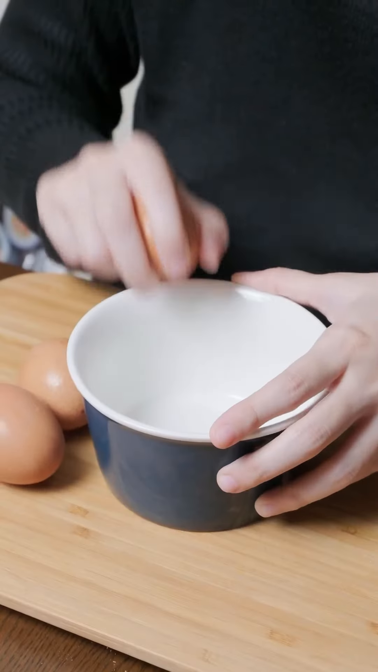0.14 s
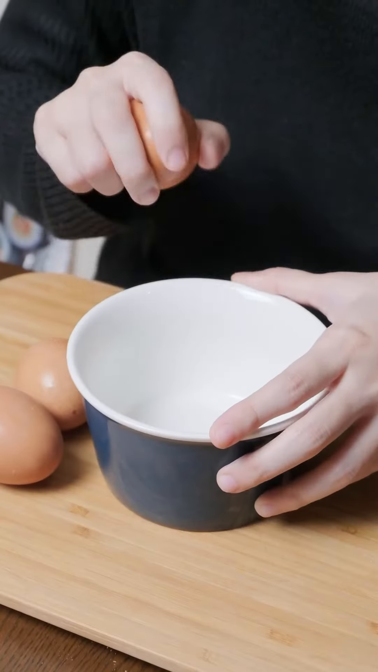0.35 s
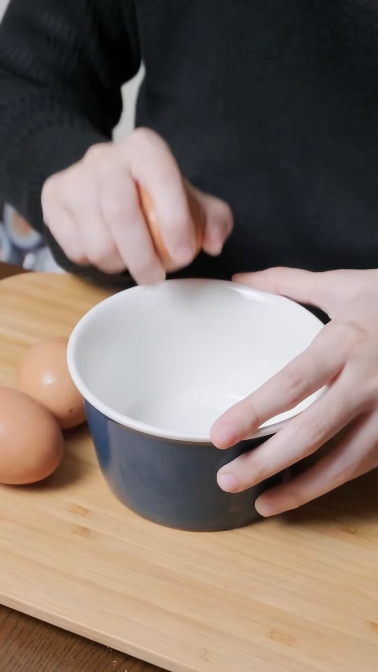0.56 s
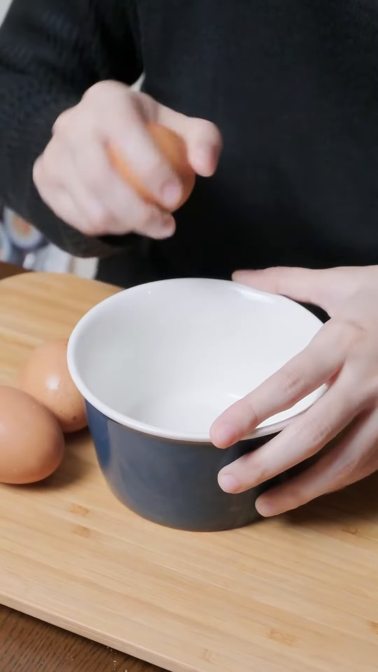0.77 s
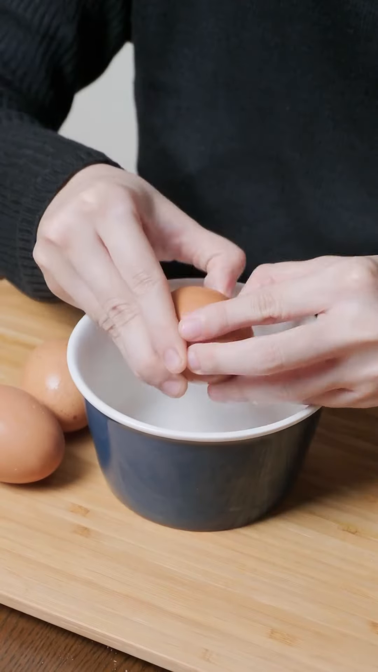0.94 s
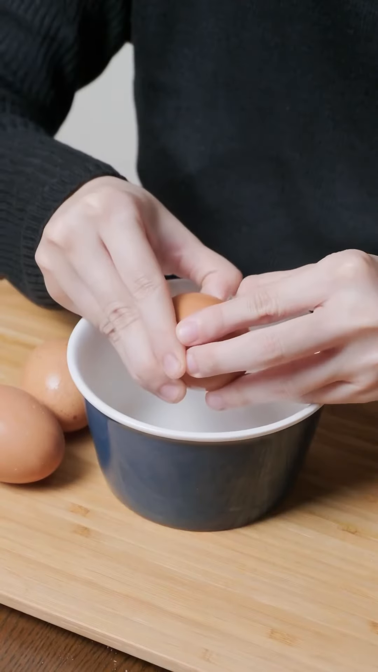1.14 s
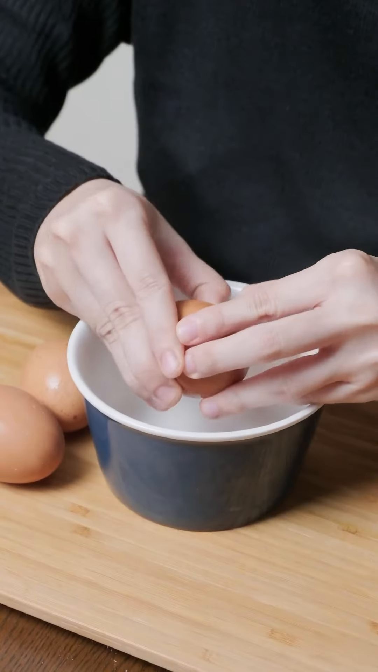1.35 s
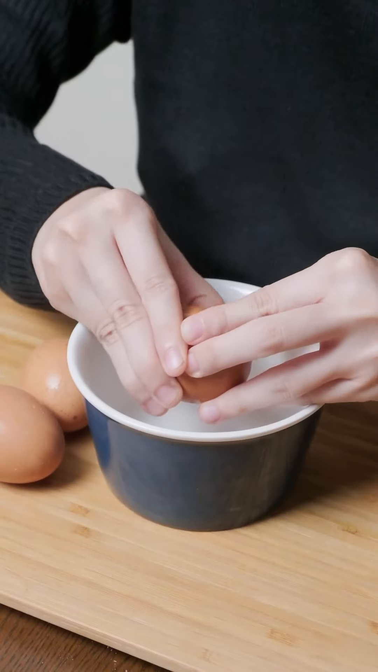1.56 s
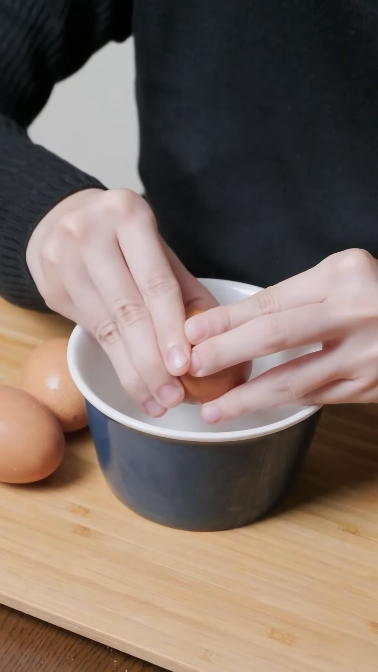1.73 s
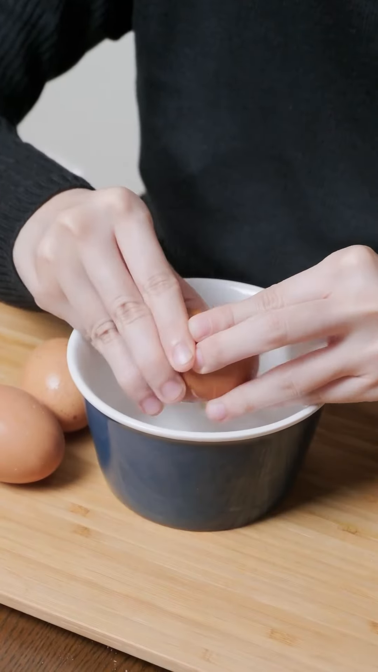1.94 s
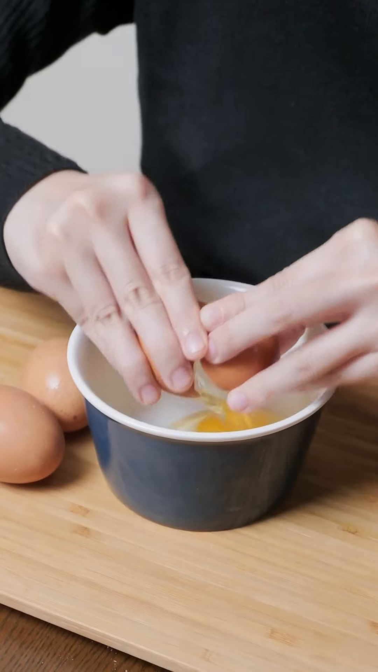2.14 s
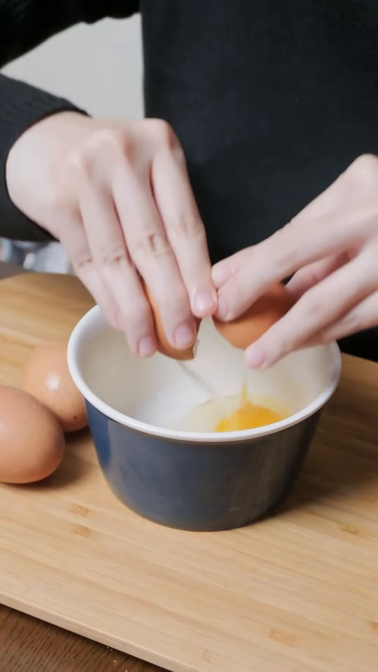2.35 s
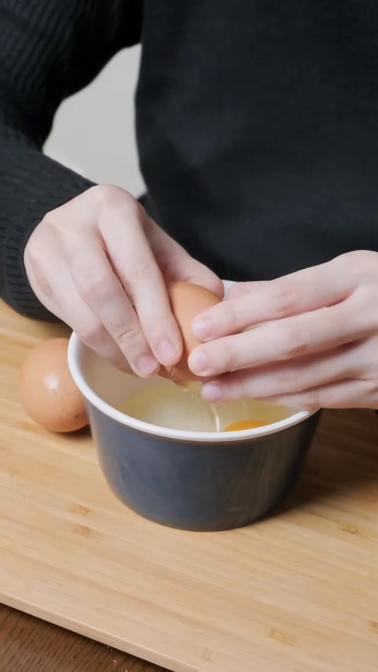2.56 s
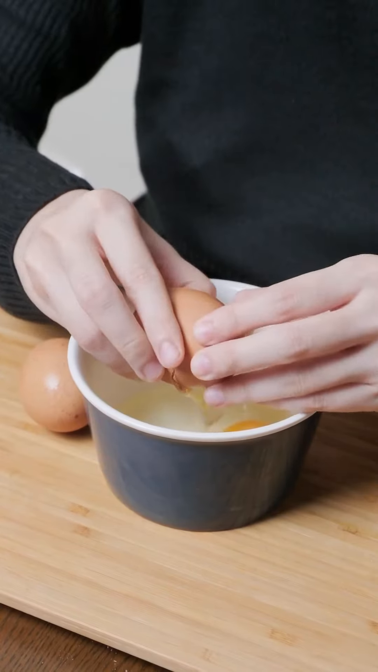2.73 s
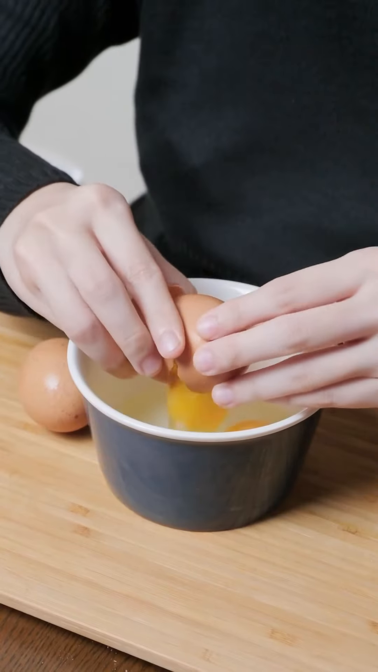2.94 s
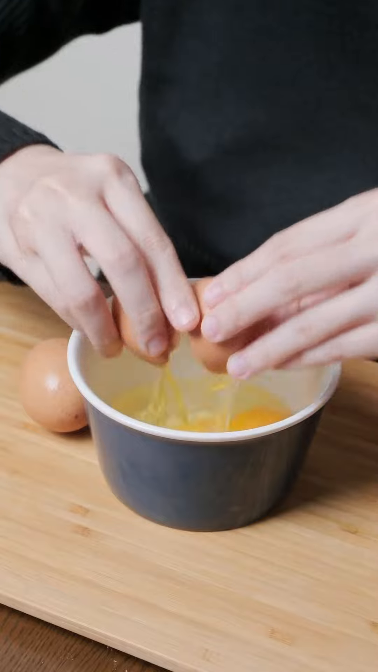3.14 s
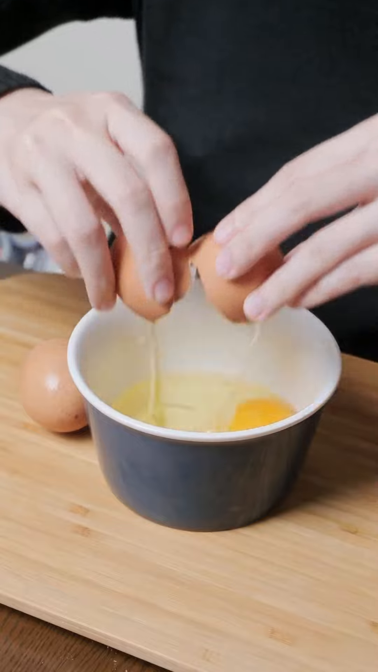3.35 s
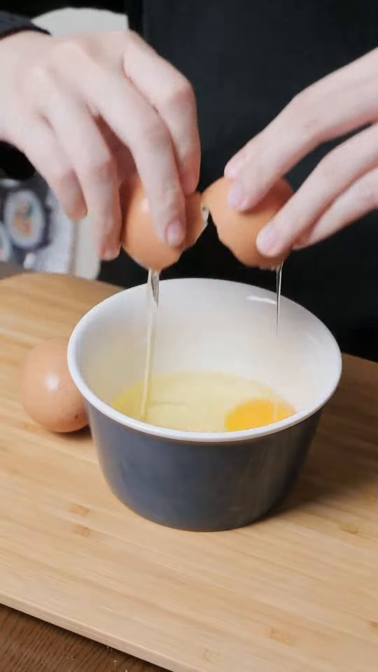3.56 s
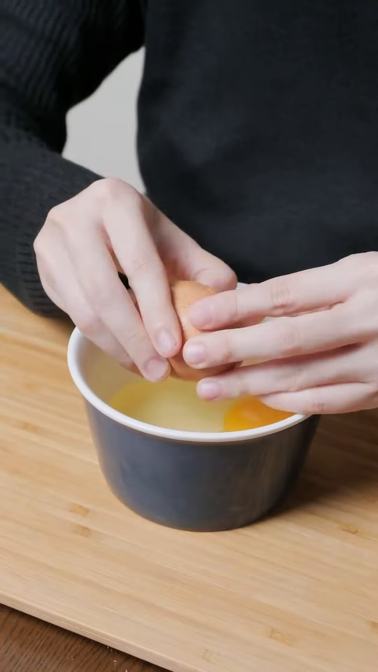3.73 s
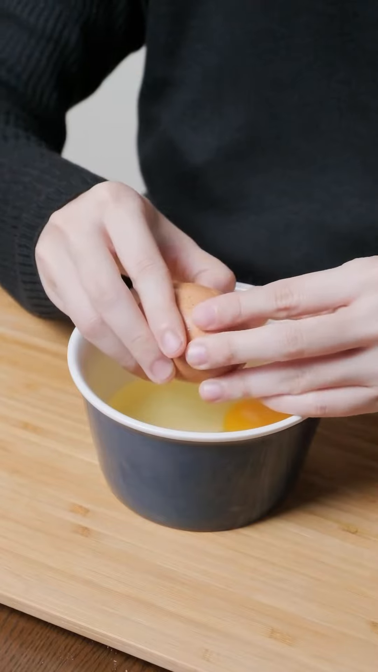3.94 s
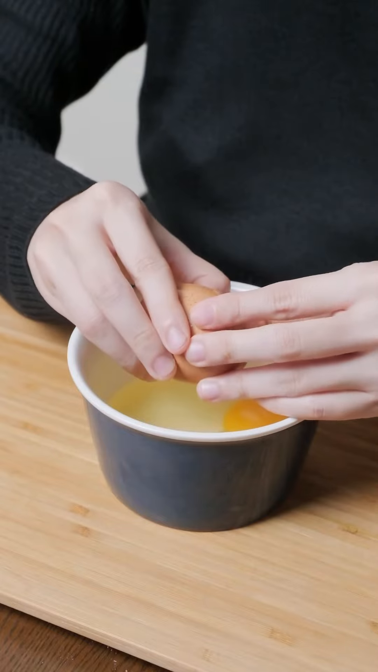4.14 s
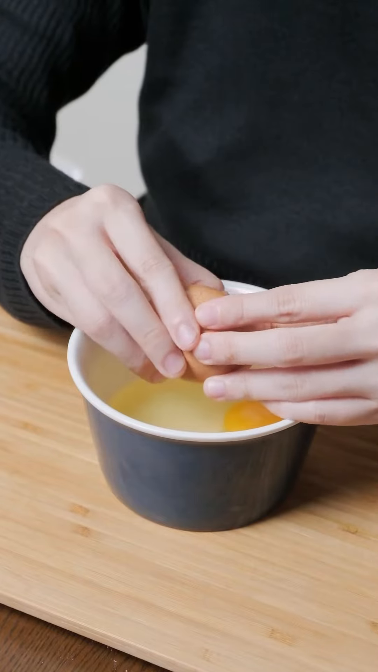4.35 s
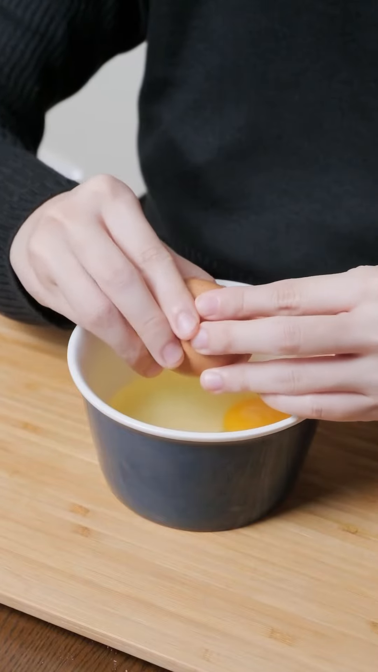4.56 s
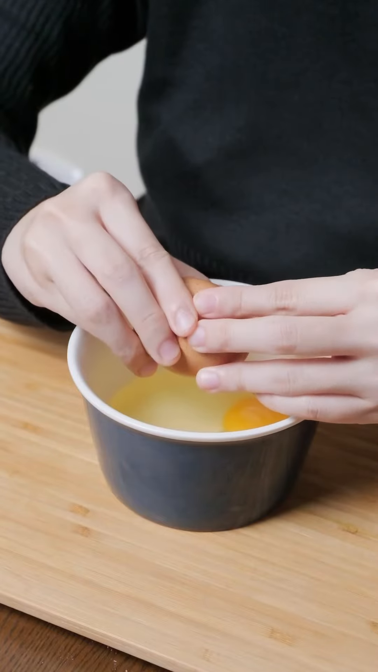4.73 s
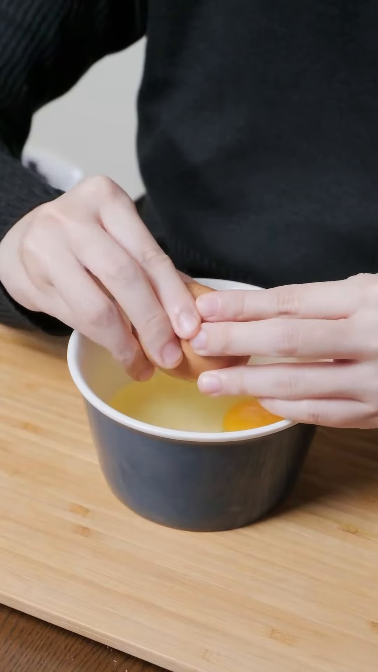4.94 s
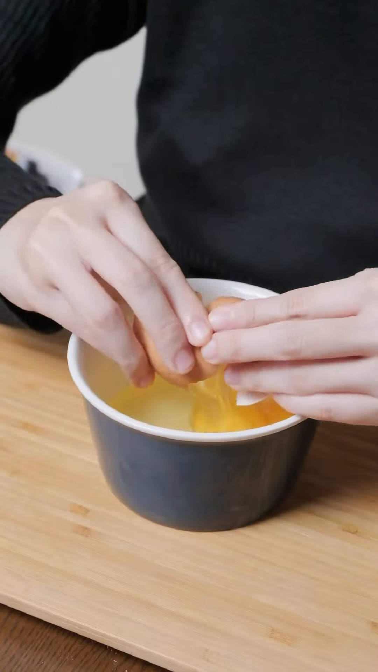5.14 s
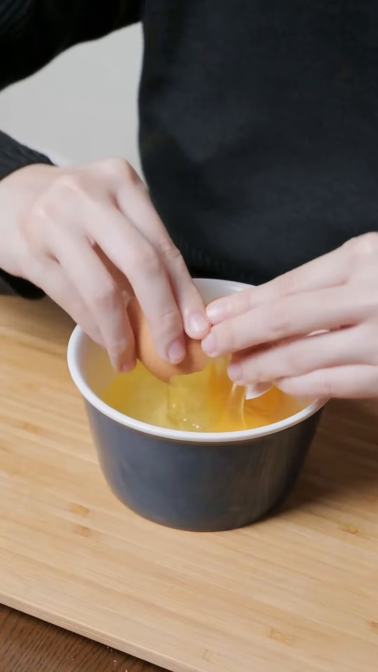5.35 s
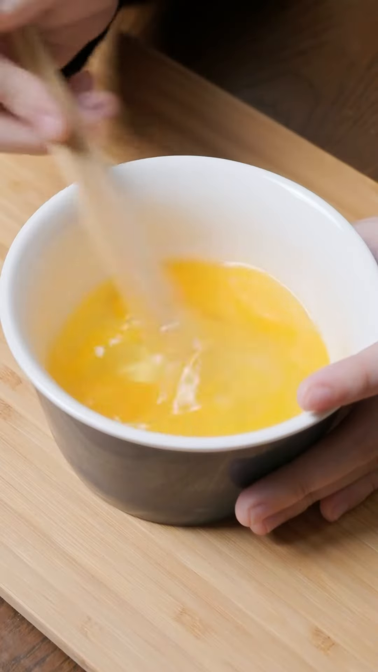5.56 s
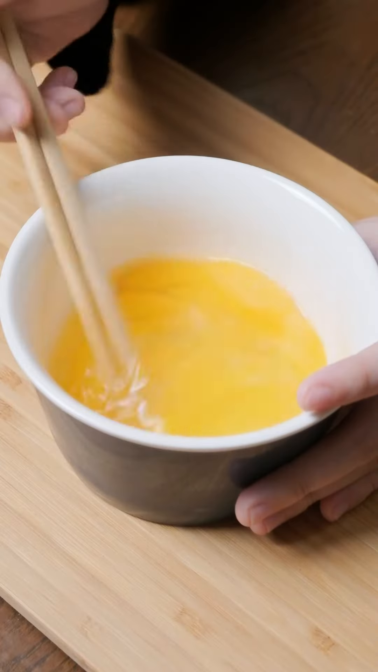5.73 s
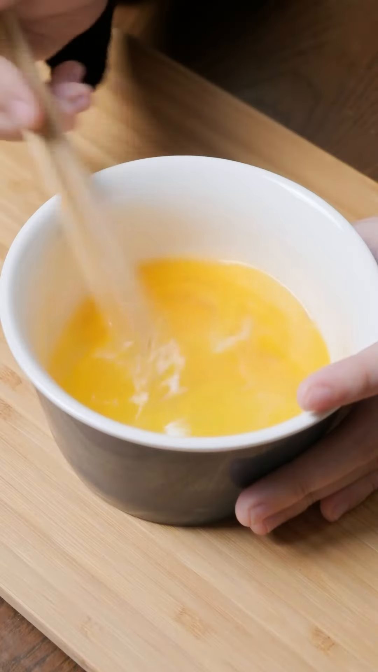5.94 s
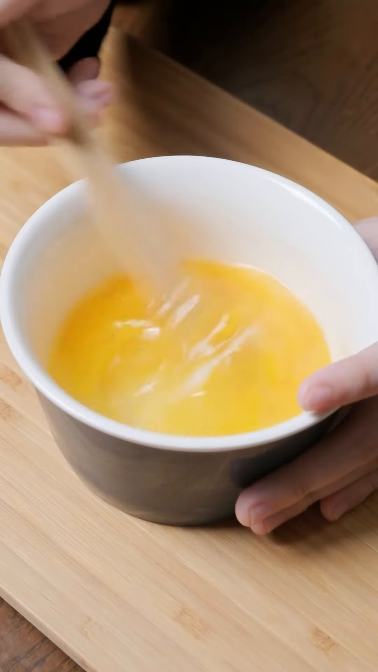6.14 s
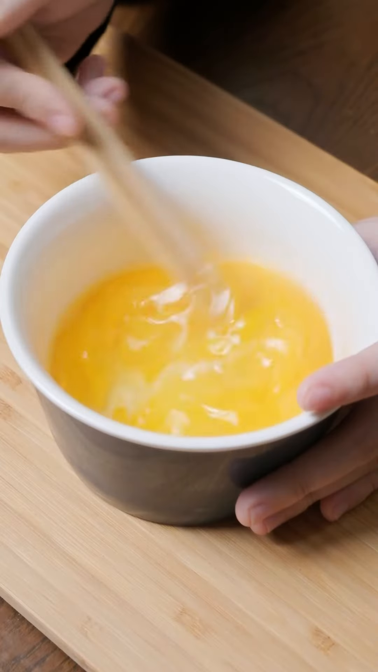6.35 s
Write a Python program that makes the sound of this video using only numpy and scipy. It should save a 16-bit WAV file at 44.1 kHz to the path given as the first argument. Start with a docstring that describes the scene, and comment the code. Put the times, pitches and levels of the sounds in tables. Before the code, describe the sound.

Two blunt, loud knocks of egg on a bowl open the scene, slapping the wooden board and echoing round the kitchen. Much quieter crisp shell snaps, thumb-squeezed ticks and small bubbling plops follow in bursts with pauses between. At the end, a short wet swish leads into rapid chopstick taps on ceramic. Close microphone, constant soft room rumble and hiss, slightly ducked after the knocks.

```python
"""Over steady room noise and hiss, an egg is knocked hard twice on the rim of a ceramic bowl, with fainter knocks.
The blows ring struck modes, thump and crunch; the kitchen echoes in filtered noise, and the gain ducks.
Shells are then pulled apart: clustered clicks make dry snaps, films burst and bubbles ring in wet smacks.
At the end wooden chopsticks drag through the eggs and click on the bowl about five times a second."""
import sys
import numpy as np
from scipy import signal
from scipy.fft import rfft, irfft
from scipy.io import wavfile

SR = 44100
rng = np.random.default_rng(int(sys.argv[2]) if len(sys.argv) > 2 else 0)


def put_to_file(sound):
    """Save the sound as 16-bit audio at rate SR, in the file named by the first command-line argument."""
    columns = np.atleast_2d(sound).T  # one column per channel
    safe = np.clip(columns, -1, 1)
    whole_steps = np.round(safe * 32767)
    wavfile.write(sys.argv[1], SR, whole_steps.astype(np.int16))


N = 286209
T = np.arange(6000) / SR  # time within one short sound [s]


def amp(db):
    """Decibels to amplitude ratio."""
    return 10 ** (np.asarray(db) / 20)


def at_level(x, db):
    """Scales a short sound to the energy of 10 ms at this level."""
    energy = np.sum(x ** 2) + 1e-20
    return amp(db) * x * np.sqrt(0.01 * SR / energy)


def read(points, hz, axis=1):
    """A table's column interpolated along log frequency."""
    points = np.array(points)
    return np.interp(np.log(hz + 1), np.log(points[:, 0]), points[:, axis])


def add(mix, s, sound):
    """Lays a sound into the mix from s seconds, cutting it at the mix's end."""
    part = mix[round(s * SR):][:len(sound)]
    part += sound[:len(part)]


def drive(force, response):
    """Lets a force excite a body, by convolution with its response."""
    return signal.fftconvolve(force, response)[:len(T)]


def click(spectrum):
    """The causal, minimum-phase impulse of a given colour."""
    log_gain = np.log(amp(read(spectrum, abs(np.fft.fftfreq(len(T), 1 / SR)))))
    minimum_phase = np.exp(np.conj(signal.hilbert(log_gain)))
    return np.fft.ifft(minimum_phase).real * (T < T[-1] / 2)


def mode(hz, t60, glide=0):
    """A dying sine whose pitch may drift by a share over its life; it radiates little far below its pitch."""
    pitch = hz * (1 + glide * np.minimum(T / t60, 1))
    decay = np.exp(-np.log(1000) * T / t60)
    swing = np.sin(2 * np.pi * np.cumsum(pitch) / SR) * decay
    return signal.lfilter(*signal.butter(1, hz / 4, "high", fs=SR), swing)


def ring(modes, stretch=1):
    """Modes of an object; neighbours swing in opposite senses."""
    out = np.zeros(len(T))
    for k, (hz, db, t60) in enumerate(modes):
        out += (-1) ** k * amp(db) * mode(hz * stretch, t60)
    return out


def crumble(length, per_s=7000, spread_db=1.5, first=0.44):
    """The force of one break, followed by a dying cluster of tiny ones."""
    size = amp(spread_db * np.minimum(rng.exponential(1, len(T)), 4))
    sense = rng.choice([-1, 1], len(T))
    happens = rng.random(len(T)) < per_s / SR
    force = size * sense * happens * np.exp(-(T / (1.8 * length)) ** 2)
    force /= np.linalg.norm(force) + 1e-9
    force[0] += first
    return force


def noise(gain):
    """Noise of unit level, shaped by a gain at each frequency."""
    x = irfft(rfft(rng.standard_normal(N)) * gain, N)
    return x / x.std()


# colour of the kitchen's steady noise: (frequency [Hz], relative density [dB per Hz])
AIR_COLOUR = [(12, -30), (20, -1.5), (79, -1), (158, -10.5), (187, -1.5), (277, -11), (377, -9.5),
              (607, -10), (1250, -13), (1600, -20), (2000, -22.5), (4500, -28), (6200, -29.5), (9000, -51)]
# level of that noise over time: (time [s], level [dB])
AIR_LEVEL = [(0, -54.5), (1.002, -56), (2.299, -57), (3.4, -58.5), (4.501, -58.5), (6.5, -59)]
# soft resonances in the room noise: (frequency [Hz], width [Hz], level [dB])
AIR_RESONANCES = [(186, 90, -77), (366, 60, -76), (608, 63, -65), (1076, 240, -69.5), (5800, 420, -75)]
# colour of each channel's own hiss: (frequency [Hz], relative density [dB per Hz])
HISS_COLOUR = [(30, 8.5), (400, 4.5), (3000, -1.5), (10000, 2), (16000, 0)]


def air(hiss_db=-64.5):
    """Steady room noise with a few soft resonances, under a faint independent hiss in each channel."""
    hz = np.fft.rfftfreq(N, 1 / SR)
    hum = np.zeros(N)
    for centre, width, db in AIR_RESONANCES:
        hum += amp(db) * noise(1 / (1 + (2 * (hz - centre) / width) ** 2))
    level_db = np.interp(np.arange(N) / SR, *np.transpose(AIR_LEVEL))
    room = noise(amp(read(AIR_COLOUR, hz))) * amp(level_db)
    hiss = np.array([noise(amp(read(HISS_COLOUR, hz))) for _ in range(2)])
    return hum + room + amp(hiss_db) * hiss


# the bowl, damped by hand and board: (frequency [Hz], relative level [dB], t60 [s])
BOWL_MODES = [(134, -16.5, 0.14), (192, -11, 0.11), (408, -14.5, 0.022), (690, -8.5, 0.0076),
              (970, -1, 0.013), (1110, -9, 0.034), (1210, -6, 0.017), (1582, -6.5, 0.036), (1890, -9, 0.01),
              (2370, -1.5, .011), (2760, -25, 0.14), (3640, -14, .018), (4320, -17, 0.0095),
              (4730, -21, 0.057), (5568, -24, .08), (5800, -25.5, 0.12), (6900, -27, 0.04),
              (10600, -19, .025)]
# egg against the rim: (time [s], ring level [dB], contact brightness [Hz],
#   thump pitch of the bowl on its board [Hz], thump level [dB], crunch level of the shell [dB])
RIM_KNOCKS = [(0.1899, -12.5, 1300, 414, -16, -36.5), (0.1927, -10.5, 796, 745, -4.5, -31.5),
              (0.4703, -39, 2506, 428, -49.5, -54), (0.493, -14.5, 2010, 499, -17, -7),
              (0.496, -20, 2015, 942, -20, -20), (0.7774, -43.5, 2000, 438, -47.5, -58.5)]


def knocks():
    """The blunt egg rings the bowl through a softened contact, and the bowl thumps on the board."""
    out = np.zeros(N)
    bowl = ring(BOWL_MODES)
    for s, ring_db, bright_hz, thump_hz, thump_db, _ in RIM_KNOCKS:
        contact = np.exp(-2 * np.pi * bright_hz * T)
        thump = mode(thump_hz, 0.021) * (1 - np.exp(-T / 0.0015))
        add(out, s, at_level(drive(contact, bowl), ring_db) + at_level(thump, thump_db))
    return out


# the shell crushed on the rim: (frequency [Hz], relative level [dB])
CRUNCH_COLOUR = [(500, -22.5), (1500, -12.5), (2270, -0.5), (2950, -13.5), (3750, 0.5), (4400, -3.5),
                 (5000, -6), (5600, 1.5), (6300, -12), (10700, -19), (15000, -15)]


def crunches():
    """The shell gives way on the rim, then caves in for a few milliseconds."""
    out = np.zeros(N)
    for s, *_, crunch_db in RIM_KNOCKS:
        give = crumble(0.001, per_s=34000)
        cave_in = crumble(0.0033, per_s=16000, spread_db=0, first=0)
        add(out, s, at_level(drive(give + 1.2 * cave_in, click(CRUNCH_COLOUR)), crunch_db))
    return out


# the board's crowded modes: (frequency [Hz], relative level [dB])
SLAP_COLOUR = [(90, -15.5), (150, -2), (280, -2.5), (700, -2.5), (1100, 1.5), (1600, -2), (1900, -15.5),
               (2700, -22), (3300, -30.5), (8000, -47.5)]


def board(db=-9):
    """Each knock also slaps the wide board 1 ms later, which radiates into the whole room."""
    out = np.zeros(N)
    for s, ring_db, *_ in RIM_KNOCKS:
        slap = drive(crumble(0.0023, first=1.2), click(SLAP_COLOUR))
        add(out, s + 0.001, at_level(slap, ring_db + db))
    return out


# the kitchen's echo, before each source's share:
#   (frequency [Hz], early level [dB], early t60 [s], late level [dB], late t60 [s])
ECHO = [(150, -12.5, 0.33, -17, .6), (490, -7, 0.36, -21.5, 0.34), (730, -17.5, 0.15, -18.5, .65),
        (1115, -7.5, 0.26, -17.5, .7), (1560, -9.5, .18, -19.5, .65), (2200, -14.5, 0.27, -26.5, 0.63),
        (3988, -12, 0.23, -22.5, 0.28), (5950, -13, 0.15, -23, .4), (9000, -10.5, 0.22, -23, 0.33),
        (14680, -18.5, 0.12, -29, .25)]


def kitchen(x, gap=0.005):
    """Dense reflections after a gap [s]: a quick early field and a fainter slow one, as decaying noise."""
    hz, t, z = signal.stft(rng.standard_normal(SR), SR, nperseg=256)
    early_db, early_t60, late_db, late_t60 = (read(ECHO, hz, axis=k)[:, None] for k in range(1, 5))

    def power(db, t60):
        """Exponential decay whose total energy is set by the level."""
        rate = 2 * np.log(1000) / t60
        return amp(db) ** 2 * rate / SR * np.exp(-rate * t)

    envelope = np.sqrt(power(early_db, early_t60) + power(late_db, late_t60))
    tail = signal.istft(z * envelope, SR, nperseg=256)[1]
    return signal.fftconvolve(x, np.r_[np.zeros(round(gap * SR)), tail])[:N]


# colours of the dry snap, the splinters' fizz and the wet hollow: (frequency [Hz], relative level [dB])
SNAP_COLOUR = [(200, -50), (1200, -44), (2400, -15.5), (3500, 6), (4400, 5), (5500, 11), (6400, 5.5),
               (7300, -5.5), (10000, -37)]
FIZZ_COLOUR = [(500, -52), (4000, -29), (6500, -18), (7700, -2), (9500, -2), (11000, -4), (14000, 1),
               (16000, -9.5)]
HOLLOW_COLOUR = [(150, -85), (600, -52), (1300, -7.5), (1800, 2.5), (2500, 2.5), (3200, -26.5),
                 (5000, -36.5)]
# an egg held in the hands: (frequency [Hz], relative level [dB], t60 [s])
HAND_MODES = [(297, -11.5, 0.018), (568, -2.5, 0.012), (997, 0.5, 0.021)]
# a closed egg thuds in the hands, a gaping one rings.
# levels against the snap, before brittleness: (closed [dB], gaping [dB])
HOLLOW_LEVELS = (-9, 9)
THUD_LEVELS = (0.5, -31.5)
# harder breaks shed more splinters: fizz against a hard snap [dB], and its gain per dB of snap
HARD_SNAP_DB, FIZZ_DB, FIZZ_GROWTH = -30, -6, 0.2
BRITTLE_LOSS = 1.06  # dB that hollow and thud lose for each dB of fizz gained by brittleness
# shell breaking: (time [s], crumbling time scale [s], snap level [dB], hollow pitch [Hz],
#   how far the shell gapes [0-1], brittleness [dB])
SHELL_CRACKS = [(.972, 0.0021, -52, 2630, 0.06, 4), (.9896, 0.0022, -32, 2600, .1, 1),
                (1.0593, 0.0034, -28, 2300, 0.07, 1), (1.3678, 0.0019, -48.5, 2140, 0.4, 0.5),
                (1.4994, .0015, -60.5, 2270, 0.43, -2.5), (1.7038, 0.0019, -46.5, 2170, 0.15, 3),
                (1.7334, .002, -47.5, 2540, 0.13, 0.5), (1.8822, 0.0022, -47.5, 2200, 0.18, -3),
                (1.926, 0.0042, -48, 2280, 0.16, 1), (1.9428, .0016, -33, 3060, 0.27, 4.5),
                (1.9751, 0.0042, -30, 2717, 0.71, -1.5), (2.0642, 0.0014, -40, 1840, 0.62, 1),
                (2.1206, 0.0012, -51.5, 1970, .5, 6.5), (2.426, 0.0064, -44.5, 1920, 0.1, 1),
                (2.5057, 0.012, -37.5, 2300, 0.2, -2), (2.5129, 0.0056, -31, 2280, 0.03, 0),
                (2.5214, .0017, -29, 2370, 0.3, -3), (2.798, .0035, -46.5, 2530, 0.2, -0.5),
                (2.8045, .0024, -30, 1530, 0.39, 2), (2.816, 0.0057, -34.5, 1680, 1, 3.5),
                (2.832, 0.0026, -29.5, 1786, 0.43, -4.5), (3.0402, 0.0017, -46, 2300, 0.22, -3),
                (3.0898, 0.0039, -45.5, 1970, .25, -3), (3.6468, 0.0017, -55.5, 2590, 0.13, 0),
                (3.689, 0.0011, -54, 2380, 0.28, 1), (3.8247, 0.0015, -53.5, 2538, 0.15, 2),
                (3.8847, .0019, -54.5, 2600, 0.28, 5.5), (4.188, 0.0017, -52, 1630, 0.04, -2.5),
                (4.2073, .002, -51, 2270, 0.02, -4), (4.2523, 0.0019, -34.5, 2120, 0.17, -3),
                (4.2636, 0.0024, -32, 2480, 0.07, 2), (4.7177, 0.0016, -55.5, 2620, 0.19, -1.5),
                (4.9687, 0.0047, -41, 3060, 0, 6), (4.983, 0.0094, -33.5, 2264, 0.09, -0.5),
                (4.9969, 0.0066, -25, 2670, 0.36, 0.5), (5.005, 0.0023, -24.5, 2395, 0.48, 1),
                (5.015, 0.0057, -33, 2870, 0.53, -0.5), (5.0833, 0.0022, -44.5, 2320, 0.46, -1)]


def shells():
    """Each fracture snaps, sheds splinters, rings the wet hollow of the shell and jolts the hands."""
    out = np.zeros(N)
    snap_click, fizz_click, hollow_click = click(SNAP_COLOUR), click(FIZZ_COLOUR), click(HOLLOW_COLOUR)
    hands = ring(HAND_MODES)
    for s, length, snap_db, hollow_hz, gape, brittle_db in SHELL_CRACKS:
        fizz_db = snap_db + FIZZ_DB + FIZZ_GROWTH * (snap_db - HARD_SNAP_DB) + brittle_db
        body_db = snap_db - BRITTLE_LOSS * brittle_db
        hollow_db = body_db + np.interp(gape, [0, 1], HOLLOW_LEVELS)
        thud_db = body_db + np.interp(gape, [0, 1], THUD_LEVELS)
        force = crumble(length, spread_db=6.5, first=0.6)
        snap = at_level(drive(force, snap_click), snap_db)
        fizz = at_level(drive(force, fizz_click), fizz_db)
        pitched = at_level(drive(force, mode(hollow_hz, 0.024)), -2.5)
        hollow = pitched + at_level(drive(force, hollow_click), -6)
        thud = at_level(drive(force, hands), thud_db)
        add(out, s, snap + fizz + at_level(hollow, hollow_db) + thud)
    return out


# thumbs working at the shell: (start [s], end [s], tick rate [per s], level of the softest ticks [dB])
THUMB_SQUEEZES = [(1.15, 1.87, 20.6, -65), (1.891, 2.12, 34.8, -58), (2.398, 2.5, 48.4, -56.5),
                  (2.55, 3.15, 12.2, -65), (3.632, 3.94, 25, -65.5), (4.651, 4.96, 13, -67.5),
                  (5.029, 5.19, 34.4, -63)]


def crinkle(spread_db=2, colour_db=5, fizz_db=-4, hollow_db=2):
    """Faint ticks of shell and membrane, each of its own colour, at uneven intervals while the thumbs squeeze."""
    out = np.zeros(N)
    fizz, hollow = amp(fizz_db) * click(FIZZ_COLOUR), amp(hollow_db) * click(HOLLOW_COLOUR)
    colours = np.array([click(SNAP_COLOUR), fizz, hollow])
    for start, stop, per_s, db in THUMB_SQUEEZES:
        for slot in np.arange(start, stop, 1 / per_s):
            blend = amp(colour_db * rng.standard_normal(3)) @ colours
            tick = drive(crumble(0.0024), blend)
            tick_db = db + spread_db * min(rng.exponential(), 3)
            add(out, slot + rng.random() / per_s, at_level(tick, tick_db))
    return out


# colour of wet egg: (frequency [Hz], relative level [dB])
WET_COLOUR = [(600, -17.5), (1500, 1.5), (2400, -1), (3300, -5), (5500, -2), (6500, -3.5), (7800, -17.5),
              (14000, -19.5)]
# wet smacks of egg, slipping from the shell or stirred: (time [s], smack level [dB],
#   starting bubble pitch [Hz], bubble level [dB], bubble life to t60 [cycles of that pitch])
EGG_PLOPS = [(1.9624, -48, 2010, -42.5, 27), (2.0012, -59, 2610, -37.5, 45),
             (2.0422, -44.5, 2140, -37.5, 45), (2.5769, -51, 2520, -45.5, 45), (2.995, -49, 1560, -50, 35),
             (5.1229, -48, 1839, -49, 33), (5.1352, -55, 1760, -46.5, 33), (5.1689, -60, 1790, -52, 50),
             (5.3210, -58.5, 2030, -56, 32), (5.481, -66.5, 1500, -50, 25), (5.5505, -59.5, 5100, -43, 21),
             (5.7377, -46.5, 2364, -42, 51), (5.7640, -49, 1480, -40.5, 17), (6.0727, -58, 5360, -56.5, 25),
             (6.2349, -61, 3960, -60, 24), (6.364, -53, 3070, -59, 10), (6.413, -62, 1510, -52.5, 36)]


def plops():
    """A film of egg bursts and a small bubble rings, rising in pitch."""
    out = np.zeros(N)
    for s, smack_db, hz, bubble_db, cycles in EGG_PLOPS:
        life = cycles / hz
        bubble = mode(hz, life, glide=0.075) * (1 - np.exp(-T / (0.073 * life)))
        smack = drive(crumble(0.0018), click(WET_COLOUR))
        add(out, s, at_level(smack, smack_db) + at_level(bubble, bubble_db))
    return out


# drag of the sticks through the egg: (time [s], level [dB])
STIR_LEVEL = [(5.39, -100), (5.427, -51.5), (5.45, -59), (5.48, -61.5), (5.52, -76), (5.8, -93), (6.3, -82),
              (6.37, -74), (6.49, -79)]


def swish():
    """Tiny wet bursts as the sticks drag through the egg."""
    size = rng.standard_normal(N) * amp(2.2 * np.minimum(rng.exponential(1, N), 4))
    bursts = size * (rng.random(N) < 4000 / SR)  # about 4000 bursts per second
    wet = signal.fftconvolve(bursts, click(WET_COLOUR))[:N]
    level_db = np.interp(np.arange(N) / SR, *np.transpose(STIR_LEVEL))
    return wet / wet.std() * amp(level_db)


# the chopsticks, before each landing's variation: (frequency [Hz], relative level [dB], t60 [s])
WOOD_MODES = [(2338, 0, 0.022), (2890, 1.5, 0.0014), (3720, -12, 0.012), (4580, -9, 0.0025),
              (5240, -2.5, 0.013), (6070, -4, 0.017), (6360, -13, 0.0074), (8470, -7.5, 0.004)]
# scrape of a stick's contact: (frequency [Hz], relative level [dB])
TAP_COLOUR = [(200, -35), (800, -13), (2500, 6.5), (6300, 8), (7500, -8), (10000, -14), (15000, -20)]
# the bowl pushed against its board: (frequency [Hz], relative level [dB], t60 [s])
BOARD_MODES = [(166, -5, 0.055), (283, -6.5, 0.033), (548.5, -5, 0.098), (820, 1, 0.033)]
# chopsticks on the bowl: (time [s], stroke level before the wood and scrape trims [dB],
#   second stick's delay [s], starting pitch of the air pocket in the egg [Hz],
#   pocket level [dB], push level on the bowl [dB])
STICK_STROKES = [(5.5721, -24.5, 0.0011, 1136, -33.5, -38.5), (5.7774, -31.5, .0008, 1327, -32.5, -40.5),
                 (5.9688, -33.5, .0008, 1297, -34, -45), (6.1481, -26.5, 0.001213, 1340, -31, -42.5),
                 (6.3354, -28, 0.0012, 1240, -42, -42)]


def chopsticks():
    """Two sticks land one just after the other; the air pocket they drag through the egg rings."""
    out = np.zeros(N)
    for s, stroke_db, delay, pocket_hz, pocket_db, push_db in STICK_STROKES:
        wood = np.zeros(len(T))
        for lag in (0, delay):
            # where a stick lands decides how strongly each mode rings
            modes = [(hz, db + 0.78 * rng.standard_normal(), t60) for hz, db, t60 in WOOD_MODES]
            add(wood, lag, ring(modes, stretch=1 + 0.022 * rng.standard_normal()))
        scrape = drive(crumble(0.002), click(TAP_COLOUR))
        pocket = mode(pocket_hz, 0.04, glide=0.098) * (1 - np.exp(-T / 0.00065))
        stick = at_level(wood, stroke_db - 4.5) + at_level(scrape, stroke_db - 3)
        push = at_level(ring(BOARD_MODES), push_db)
        add(out, s, stick + at_level(pocket, pocket_db) + push)
    return out


def scene():
    """The hard knocks, the shells and the beating, each with its share of the kitchen's echo."""
    rim, crunch, slap = knocks(), crunches(), board()
    eggs = shells() + crinkle()
    beating = plops() + swish() + chopsticks()
    knock_send = amp(-3.5) * rim + amp(-10.5) * crunch + amp(8.5) * slap
    echo = kitchen(knock_send + amp(2) * eggs + amp(1.5) * beating)
    return air() + rim + crunch + slap + eggs + beating + echo


def record(dry, threshold_db=-20, share=0.33, recovery_db=22):
    """Gain control ducks after loud sounds and recovers in dB per s; overloads clip, then a low-pass."""
    keep = np.exp(-1 / (0.011 * SR))  # 11 ms smoothing

    def smooth(x):
        """One-pole running average."""
        return signal.lfilter([1 - keep], [1, -keep], x)

    power_db = 10 * np.log10(smooth((dry ** 2).mean(0)) + 1e-12)
    fall_db = np.arange(N) * recovery_db / SR
    held_db = np.maximum.accumulate(power_db + fall_db) - fall_db  # peaks held, sinking steadily
    over_db = np.maximum(held_db - threshold_db, 0)
    ducked = dry / amp(share * smooth(over_db))
    low_pass = signal.firwin(255, 16150, window=("kaiser", 8), fs=SR)  # cutoff in Hz
    return signal.oaconvolve(np.clip(ducked, -1, 1), low_pass[None], "same")


dry = scene()
out = record(dry)
put_to_file(out)
```